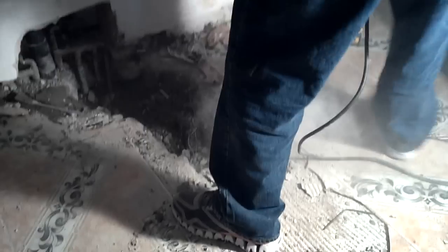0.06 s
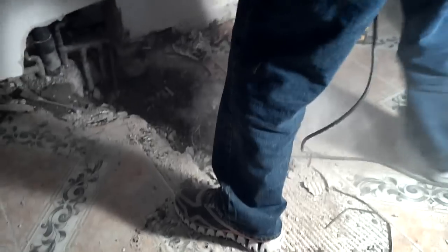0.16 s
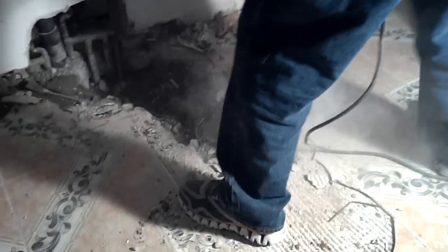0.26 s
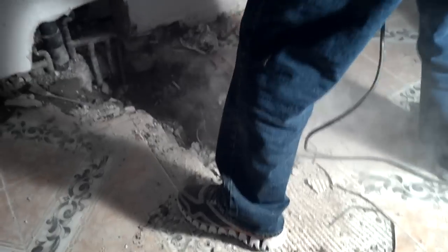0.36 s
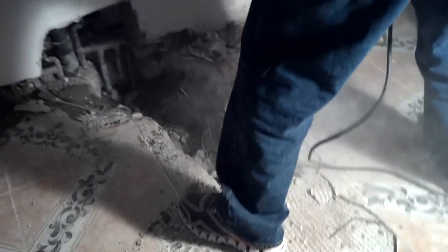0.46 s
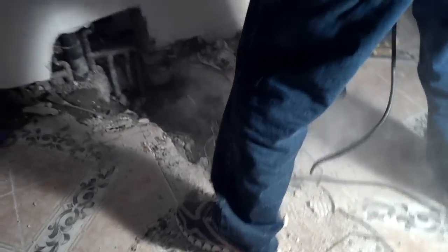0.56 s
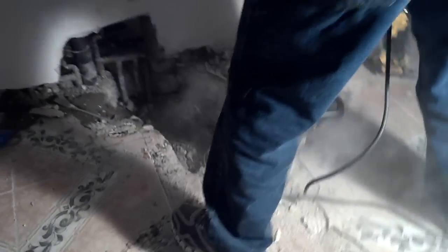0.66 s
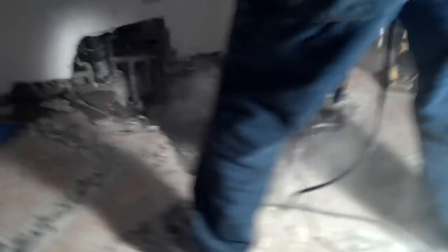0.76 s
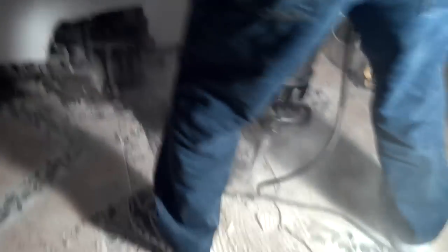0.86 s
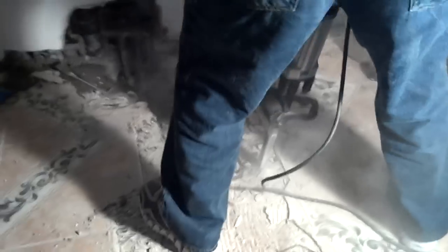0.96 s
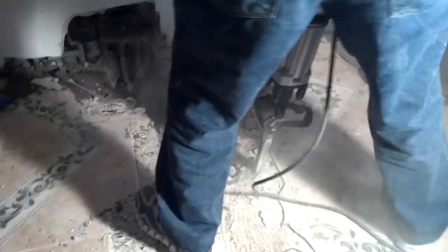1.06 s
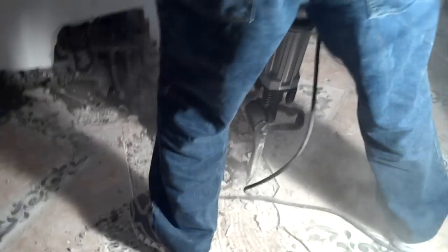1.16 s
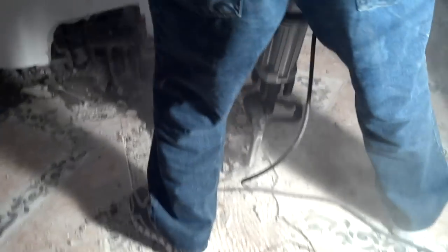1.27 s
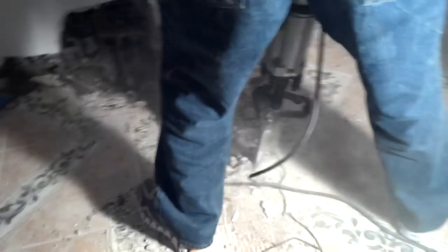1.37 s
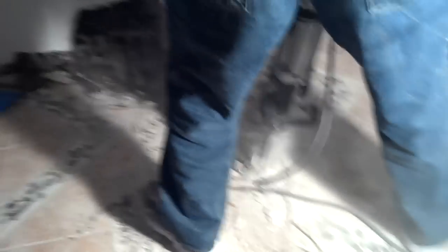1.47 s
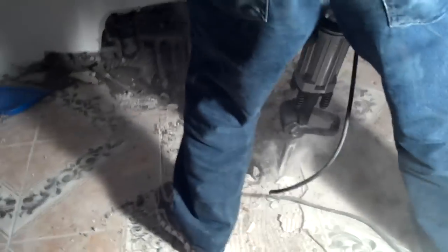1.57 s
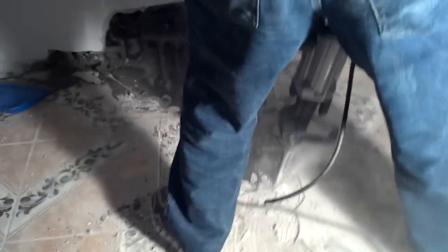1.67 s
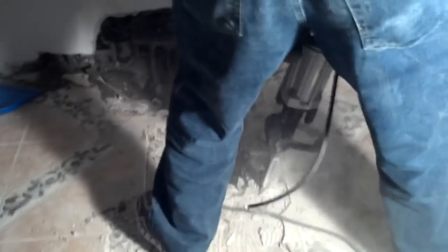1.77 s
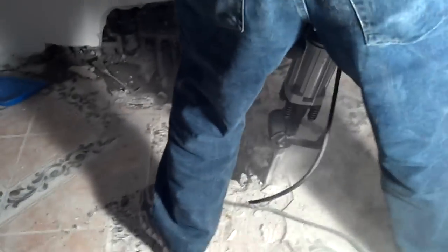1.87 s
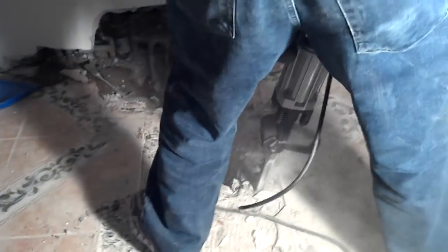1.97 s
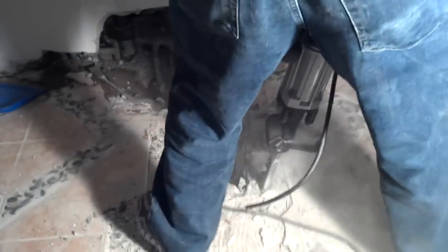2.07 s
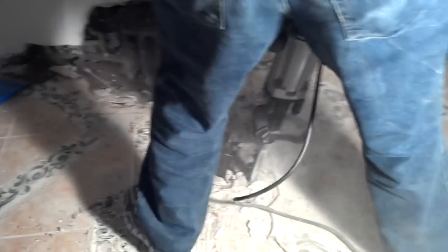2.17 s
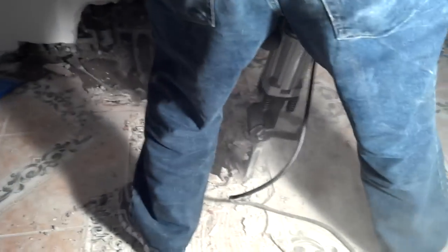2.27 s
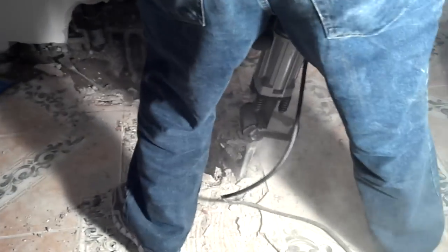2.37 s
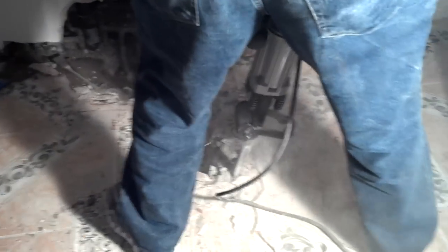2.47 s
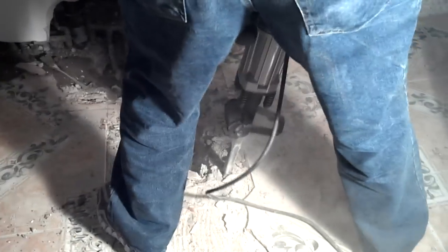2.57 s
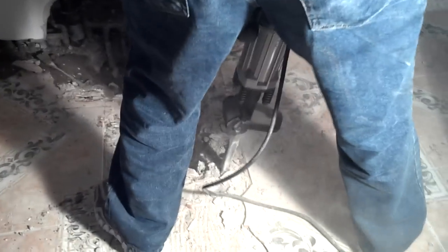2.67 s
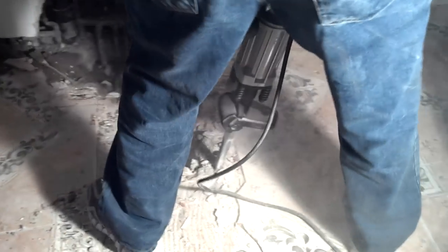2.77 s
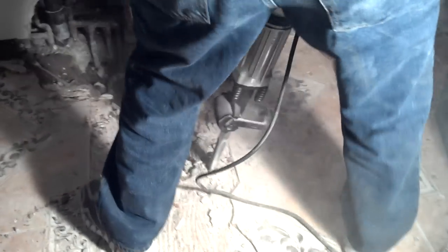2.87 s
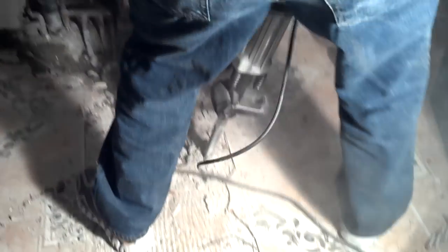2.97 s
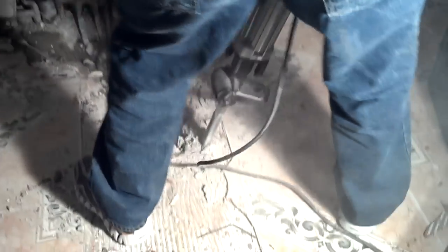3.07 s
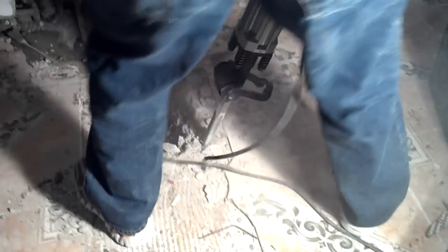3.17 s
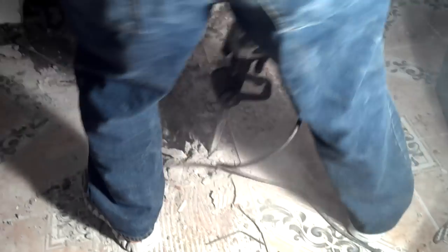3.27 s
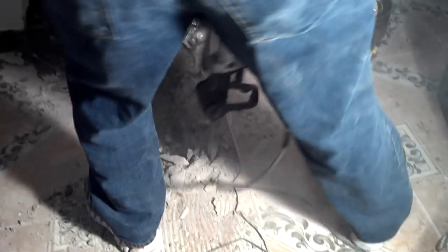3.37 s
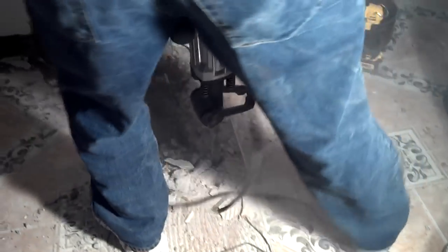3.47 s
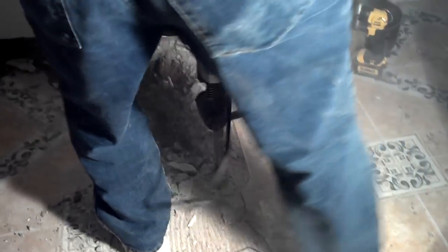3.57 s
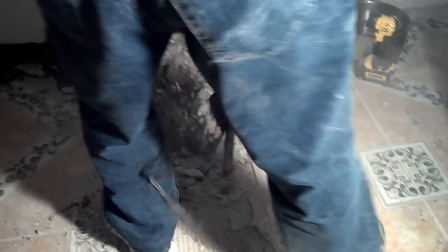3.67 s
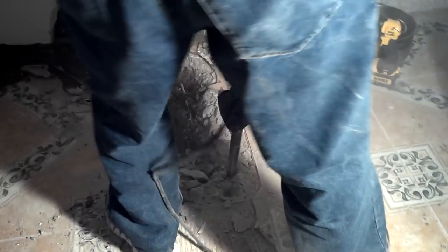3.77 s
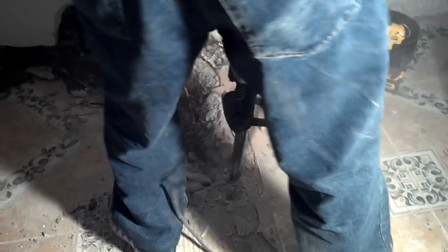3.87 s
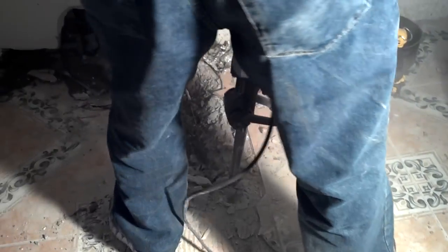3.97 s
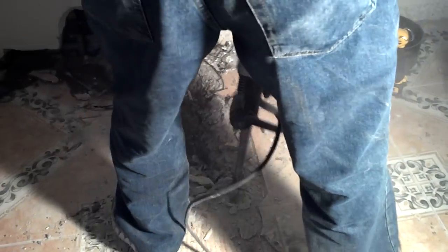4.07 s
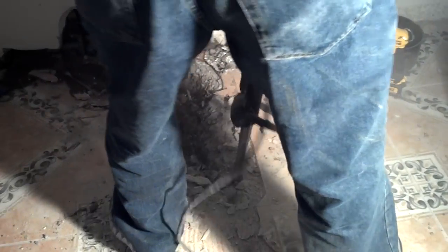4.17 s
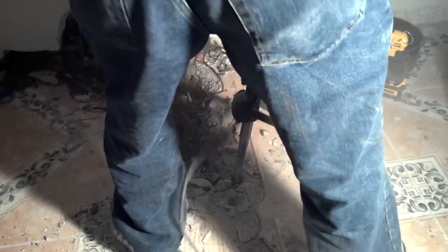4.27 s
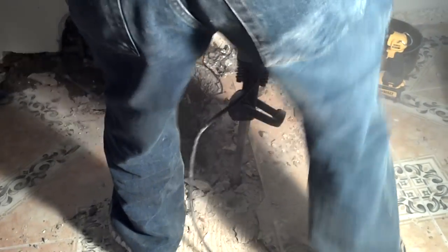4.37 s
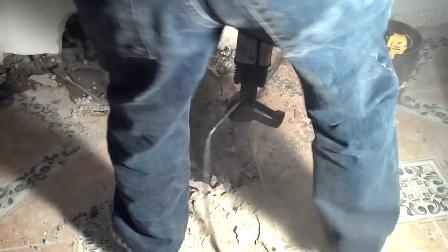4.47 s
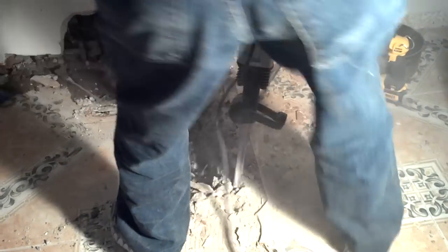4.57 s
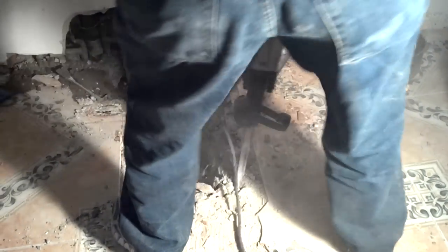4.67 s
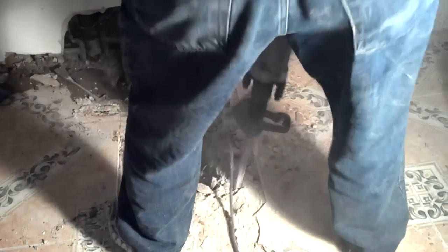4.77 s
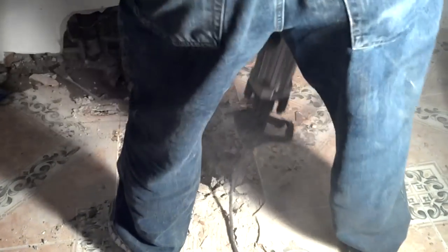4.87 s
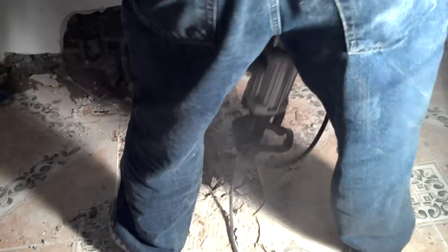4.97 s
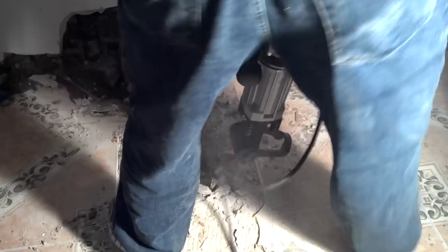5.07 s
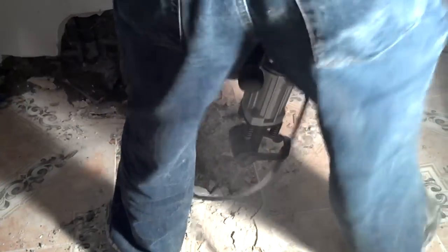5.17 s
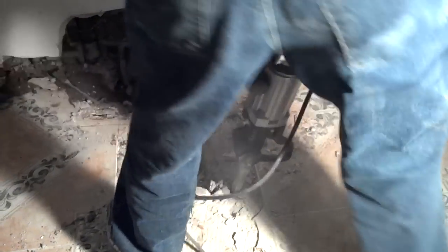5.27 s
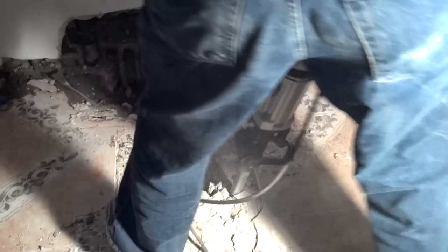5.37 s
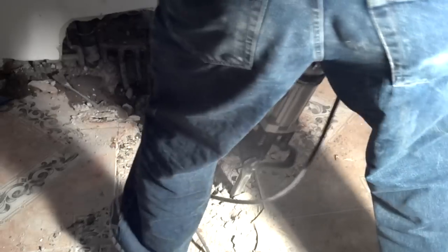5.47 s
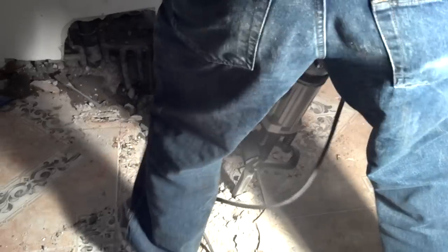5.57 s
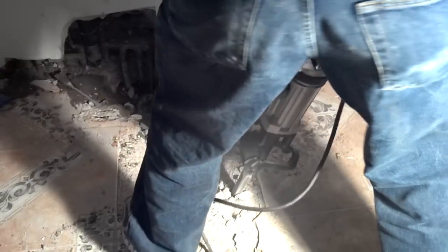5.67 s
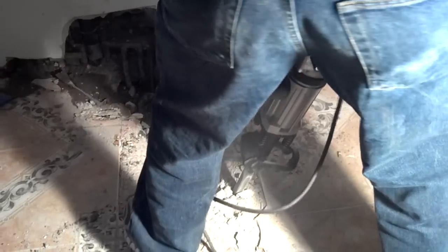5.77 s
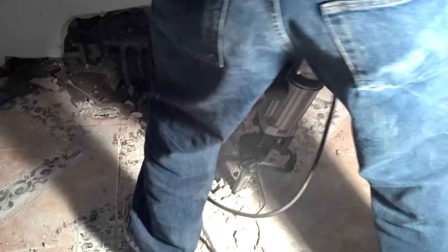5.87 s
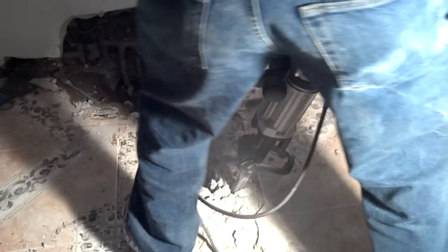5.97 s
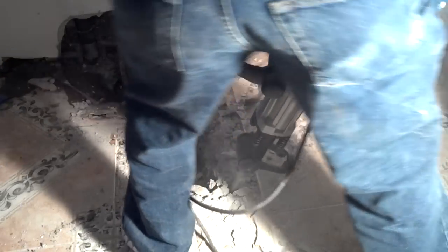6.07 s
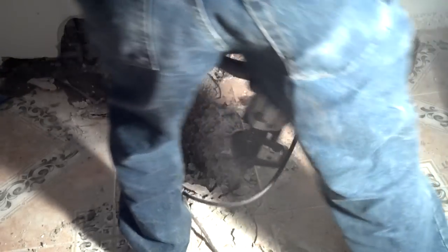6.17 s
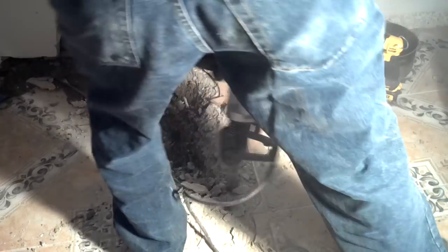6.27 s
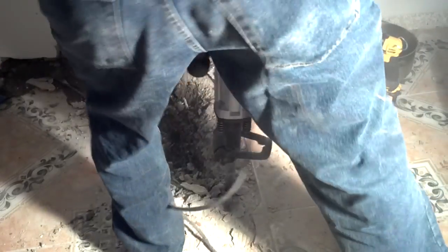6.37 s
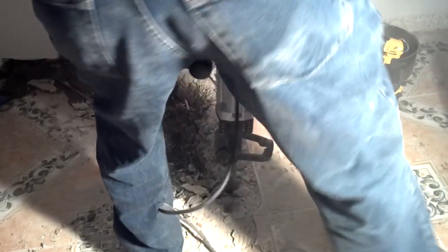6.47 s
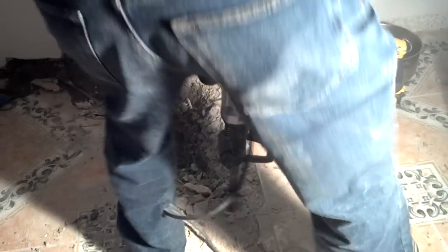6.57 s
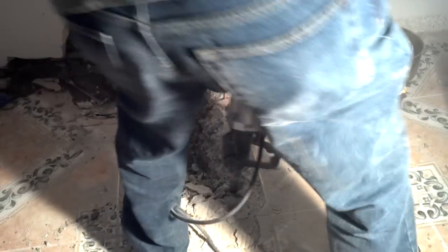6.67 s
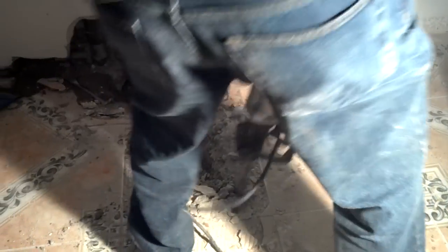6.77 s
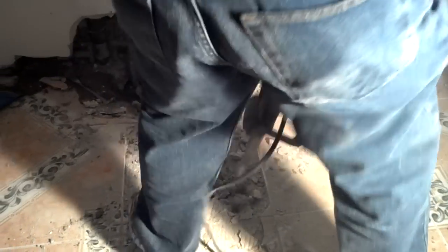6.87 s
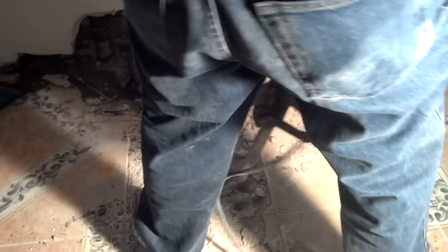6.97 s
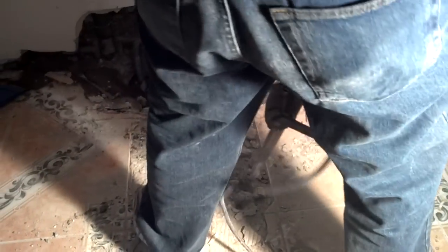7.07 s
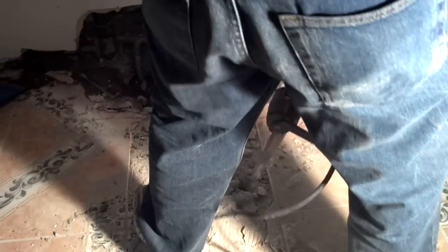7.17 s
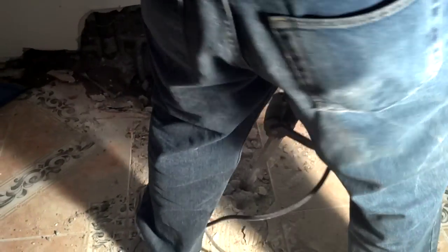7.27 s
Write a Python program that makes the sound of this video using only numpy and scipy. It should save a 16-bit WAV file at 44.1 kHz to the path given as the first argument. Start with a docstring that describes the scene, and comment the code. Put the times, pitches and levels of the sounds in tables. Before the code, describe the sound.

From 0 s a demolition hammer is already working at full force close by, about 21 to 23 blows a second. Each blow is a sharp snap with a rebound click, a mid-low slab thud, gritty tile crack and housing ring; bright steel ringing flares intermittently until about 2.4 s. Loose plates hum along and soft low bumps jolt the phone. Around 3.3 s the tone turns scrapy; at 3.44 s the blows stop, with a graze at 3.5 s, and the motor rises to a rushing whirr with a high gear whine. After light taps at 4.2 s, hammering restarts at 4.34 s, faster at about 30 a second and less thuddy, slowing to about 20 by 5.7 s, with dry splintering cracks strongest near 5.3 s. It stops at 6.17 s; the motor spins up and whirs to the end near 7.4 s, with a few grazing clicks around 6.7 s. Bare room, short reverberation.

```python
"""An electric demolition hammer chisels a tiled concrete floor in a bare room, close to a phone.
Each blow snaps, thuds into the slab, cracks the tile and rings the steel chisel and the housing; the blows
slow down under load. Lifted, the hammer stops striking and its motor, noise with a whine of gears, runs up.
Loose plates ring, pieces split off, the tip scrapes; jolts and bumps reach the phone, which widens the stereo."""
import sys
import numpy as np
from scipy import signal
from scipy.fft import rfft, irfft, next_fast_len
from scipy.io import wavfile
from scipy.ndimage import uniform_filter1d, map_coordinates

SR = 44100
rng = np.random.default_rng(int(sys.argv[2]) if len(sys.argv) > 2 else 0)


def bounce(signal):
    """Save signal as a 16-bit WAV file at the path given by the first command-line argument."""
    frames = np.transpose(np.atleast_2d(signal))
    limited = np.clip(frames, -1, 1)
    pcm = np.round(limited * 32767).astype(np.int16)
    wavfile.write(sys.argv[1], SR, pcm)


N = 322792

# lengths of a blow's tail and of its first moments (samples)
RING_LENGTH, BLOW_LENGTH = SR // 3, SR // 36
# the motor's free speed (crank turns per s)
FREE_SPEED = 29.95
# build-up time of the housing's and the plates' rings (s)
RING_RISE_S = .002
# chance variation of the thud from blow to blow (dB)
THUD_SCATTER_DB = 1.3
# The hammer is pressed to the floor. Each row: first blow in seconds, lifted in seconds.
PRESSED = [(-.023, 3.44), (4.338, 6.17)]
# The chisel sits loose and rings out. Each row: start in seconds, end in seconds, ring level in dB,
# share of the ring in the upper modes 0-1.
LOOSE_CHISEL = [(-.05, .09, -19.5, 0.3), (.31, .40, -17.5, 0.17), (.49, .57, -19.5, 0.3),
                (.58, .72, -19, .15), (.82, .90, -19, 0.2), (.96, 1.03, -20.5, 0.4),
                (1.24, 1.32, -23, 0.24), (1.52, 1.60, -20.5, 0.68), (1.62, 1.70, -19.5, 0.5),
                (1.71, 1.75, -23.5, .15), (1.89, 1.94, -20.5, 0.7), (2.03, 2.08, -17.5, 0.6),
                (2.36, 2.45, -19.3, 0.4), (5.82, 5.86, -25.5, 0)]
# Straight sound that gets past the worker's legs. Each row: time in seconds, level in dB.
PAST_LEGS = [(0, 0), (2.3, 0), (2.8, -1.5), (3.3, -3), (4.4, -5), (5, -6.5), (6.2, -7)]


def amp(db):
    """Decibels to gain."""
    return 10 ** (np.asarray(db) / 20)


def unit(x):
    """x at rms 1."""
    return x / np.sqrt(np.mean(x ** 2) + 1e-20)


def unit_blow(x):
    """x scaled to rms 1 over the first moments of a blow."""
    return x / np.sqrt(np.mean(x[..., :BLOW_LENGTH] ** 2) + 1e-20)


def along(points, hz):
    """(Hz, value) points read on a log frequency axis."""
    f, v = np.transpose(points)
    return np.interp(np.log(hz + 1), np.log(f + 1), v)


def curves(rows, t):
    """Each column after the time, read at times t."""
    s, *cols = np.transpose(rows)
    return [np.interp(t, s, c) for c in cols]


def wobble(rate):
    """A random curve through rate knots a second, smoothly joined."""
    knots = rng.standard_normal(int(N * rate / SR) + 4)
    return map_coordinates(knots, [np.arange(N) * rate / SR])


def filtered(x, response):
    """x times a complex response of frequency."""
    n = x.shape[-1]
    m = 2 * next_fast_len(n // 2 + 2048)
    return irfft(rfft(x, m) * response(np.fft.rfftfreq(m, 1 / SR)), m)[..., :n]


def coloured(x, spectrum):
    """x through the causal, minimum-phase filter that has this spectrum."""
    def response(hz):
        cepstrum = irfft(np.log(amp(along(spectrum, hz))))
        half = len(cepstrum) // 2
        # folding the cepstrum onto positive times makes the filter causal
        return np.exp(rfft(np.r_[cepstrum[0], 2 * cepstrum[1:half], np.zeros(half)]))
    return filtered(x, response)


def resonant(x, modes):
    """x through a body with these resonances, of alternating sign."""
    def response(f):
        total = 0
        for k, (hz, width, db) in enumerate(modes):
            damping = 1j * f * width
            total = total + (-1) ** k * amp(db) * damping / (hz * hz - f * f + damping)
        return total
    return filtered(x, response)


def radiated(x, modes):
    """A ringing body that radiates little deep bass."""
    low_cut = signal.butter(3, 170, "high", fs=SR, output="sos")
    return signal.sosfilt(low_cut, resonant(x, modes))


def diffuse(size):
    """White sound from all sides: alike at both microphones in the bass, a little in the presence range."""
    gap_m = .125  # distance between the microphones
    # Extra likeness from sound straight from the tool. Each row: frequency in Hz, likeness 0-1.
    straight_likeness = [(1300, 0), (2500, .35), (5000, .02)]

    def mid_side(hz):
        alike = np.sinc(2 * hz * gap_m / 343) * .97 + along(straight_likeness, hz)
        return np.sqrt([1 + alike, 1 - alike])

    mid, side = filtered(rng.standard_normal((2, size)), mid_side)
    return unit(np.array([mid + side, mid - side]))


def room(direct_db):
    """The direct sound, reaching the right microphone first, and the bare walls' decaying answer."""
    t60 = .58  # decay time in seconds
    t = np.arange(RING_LENGTH) / SR
    response = diffuse(RING_LENGTH) * amp(-60 * t / t60) * (1 - np.exp(-t / 0.012))
    response /= np.linalg.norm(response[0])
    response[[0, 1], [3, 0]] += amp(direct_db)  # left is 3 samples late
    return response


def in_room(x, direct_db):
    """A steady source heard in the room, at rms 1."""
    return unit(signal.fftconvolve(x[None], room(direct_db), axes=1)[:, :N])


def crushing(spectrum, grain_db):
    """Grainy noise of rms 1: its level flickers at random, then a spectrum colours it."""
    return unit(coloured(diffuse(N) * amp(grain_db * wobble(1500)), spectrum))


def add(track, s, sound):
    """Mix a sound into a track at s seconds."""
    start = round(s * SR)
    sound = sound[..., max(-start, 0):]
    part = track[..., max(start, 0):][..., :sound.shape[-1]]
    part += sound[..., :part.shape[-1]]


def repeated(times, levels_db, sound):
    """The same sound at every time, each at its own level."""
    out = np.zeros((2, N))
    for s, db in zip(times, levels_db):
        add(out, s, amp(db) * sound)
    return out


def slab(times, body, levels_db, direct_db, count=28):
    """Every blow sends the same push through a body and the room; echoes shift as tool and phone move."""
    places = [body(room(direct_db)) for _ in range(count + 1)]
    out = np.zeros((2, N))
    for s, db in zip(times, levels_db):
        k, part = divmod(max(s, 0) * SR / N * count, 1)
        between = (1 - part) * places[int(k)] + part * places[int(k) + 1]
        add(out, s, amp(db) * unit_blow(between))
    return out


def fracture(times, levels_db, burst_db, burst_t60, tail_t60, rise):
    """The swell and decay of every blow: a short burst and a longer tail, added as power."""
    t = np.arange(RING_LENGTH) / SR
    burst, tail = amp(burst_db - 60 * t / burst_t60), amp(-60 * t / tail_t60)
    shape = unit_blow(np.hypot(burst, tail) * (1 - np.exp(-t / rise)))
    power = np.zeros(N)
    for s, db in zip(times, levels_db):
        add(power, s, (amp(db) * shape) ** 2)
    return np.sqrt(power)


def crank(t):
    """Crank speed and load (0 or 1): held down while the chisel is pressed, running up once it is lifted."""
    run_up_s = .32  # time constant
    # Speed under load. Each row: time in seconds, speed in crank turns per second.
    pressed_speed = [(0, 21.822), (.35, 23.116), (.55, 21.362), (1.15, 21.153), (1.55, 21.749),
                     (1.8, 21.429), (2.4, 21.507), (2.9, 21.238), (3.35, 20.203), (4.3, 29.94),
                     (4.5, 29.877), (5.15, 29.557), (5.45, 25.404), (5.7, 20.447), (6.15, 20.637)]
    loaded, = curves(pressed_speed, t)
    speed, load = loaded, np.ones(len(t))
    for start, lifted in PRESSED:
        lack = FREE_SPEED - curves(pressed_speed, lifted)[0]
        run_up = FREE_SPEED - lack * np.exp(-np.maximum(t - lifted, 0) / run_up_s)
        speed = np.where(t < start, speed, np.where(t < lifted, loaded, run_up))
        load = np.where(t < start, load, t < lifted)
    return speed, load


def blow_times(start, lifted):
    """The striker lands once in every crank turn."""
    t = np.arange(start, lifted, 1 / SR)
    turns = np.cumsum(crank(t)[0]) / SR
    return np.interp(np.arange(turns[-1]), turns, t)


def blows():
    """Rows (s, thud dB, crack dB, ring dB) of all blows: each follows the force, a little by chance."""
    crack_scatter_db, ring_scatter_db = 1.3, 1
    # How hard the blows land, before chance. Each row: time in seconds, slab thud in dB, crack in dB,
    # damped chisel ring in dB.
    force_rows = [(0, -22.5, -25, -25.5), (.45, -25.5, -24.5, -25), (.65, -27.5, -22.5, -26.5),
                  (1.05, -25.5, -25, -22), (1.42, -24.5, -25.5, -38), (2.55, -25, -25.5, -42),
                  (2.8, -23, -20, -47), (3.13, -23, -20, -42), (3.28, -28, -22, -27),
                  (3.33, -30, -20, -25.5), (3.38, -42, -19, -32), (3.43, -43, -21, -42),
                  (4.34, -40.5, -26, -46), (4.52, -28, -23, -46), (4.98, -30.5, -24, -32),
                  (5.25, -24.5, -26.5, -35), (5.32, -26, -23.5, -32), (5.54, -27, -20.5, -32),
                  (5.74, -28.5, -27.5, -26.5), (5.95, -31, -22.5, -28.5), (6.13, -30.5, -21.5, -28)]
    # The lifted chisel grazes the floor. Each row: time in seconds, slab thud in dB, crack in dB,
    # chisel ring in dB.
    grazing_blows = [(3.519, -36, -19, -48), (4.213, -52, -27, -42), (4.246, -53, -37, -47),
                     (4.28, -53, -34, -46), (6.653, -49, -32, -45), (6.691, -56, -26, -25.5),
                     (6.723, -42, -26, -40), (6.761, -40, -22, -24)]
    s = np.concatenate([blow_times(*stretch) for stretch in PRESSED])
    thud_db, crack_db, ring_db = curves(force_rows, s)
    chance = rng.standard_normal((len(s), 3)).T
    thud_db = thud_db + THUD_SCATTER_DB * chance[0]
    crack_db = crack_db + crack_scatter_db * chance[1]
    ring_db = ring_db + ring_scatter_db * chance[2]
    for begin, end, db, _ in LOOSE_CHISEL:
        ring_db = np.where((s > begin) & (s < end), db, ring_db)
    return np.vstack([np.column_stack([s, thud_db, crack_db, ring_db]), grazing_blows])


def snap(times, levels_db, centre_hz):
    """The striker's direct pressure pulse: one sharp swing, first at the right microphone."""
    t = np.arange(SR // 200) / SR - .0009
    late_left = np.array([[3 / SR], [0]])
    u = (np.pi * centre_hz * (t - late_left)) ** 2
    return repeated(times, levels_db, (1 - 2 * u) * np.exp(-u))


def striker(times, thud_db, knock_db):
    """A sharp snap at every blow and another as the chisel rebounds and lands, stronger on a hard floor."""
    rebound_s, rebound_spread_s = .0175, .0008
    hard_db = .5 * np.maximum(knock_db, -10)  # the snap takes on half of the floor's knock
    snap_db = thud_db + 14.8 + hard_db + curves(PAST_LEGS, times)[0]
    rebound_db = snap_db + np.minimum(hard_db, 3) - 8.2
    again = times + rebound_s + rebound_spread_s * rng.standard_normal(len(times))
    return snap(times, snap_db, centre_hz=894) + snap(again, rebound_db, centre_hz=1200)


def punch(times, levels_db):
    """The slab swings for a few cycles, first at the right microphone, then again from the nearest wall."""
    wall_delay_s, wall_level_db = .0049, -6.5
    # First swing under the chisel. Each row: frequency in Hz, width in Hz, level in dB.
    swing_modes = [(405, 50, 0), (660, 110, -9)]
    push = np.zeros((2, SR // 10))
    push[[0, 1], [3, 0]] = 1  # left is 3 samples late
    swing = radiated(push, swing_modes)
    swing /= np.abs(swing).max()
    wall_db = wall_level_db + THUD_SCATTER_DB * 2 * rng.standard_normal(len(times))
    direct = repeated(times, levels_db + curves(PAST_LEGS, times)[0], swing)
    return direct + repeated(times + wall_delay_s, levels_db + wall_db, swing)


def housing(times, levels_db, knock_db):
    """Every blow rings the housing anew, its phases at random; a hard floor brings out the upper modes."""
    t60, hardness = .27, .45  # decay in seconds; share of the floor's knock that the upper modes take on
    # The housing's ring between blows. Each row: frequency in Hz, level in dB.
    housing_modes = [(329, 9.5), (365, 8.5), (550, 3.5), (730, -0.5), (971, 0.5), (1010, -1), (1074, 0.5),
                     (1183, 3), (1361, 4.5)]
    t = np.arange(RING_LENGTH) / SR
    hz, mode_db = np.transpose(housing_modes)
    envelope = amp(-60 * t / t60) * (1 - np.exp(-t / RING_RISE_S))
    modes = np.exp(2j * np.pi * hz[:, None] * t) * envelope
    upper = hz > 700
    out = np.zeros((2, N))
    for s, db, hard_db in zip(times, levels_db, knock_db):
        gains = amp(db + mode_db + upper * hardness * (hard_db - 3))
        phases = np.exp(2j * np.pi * rng.random(len(hz)))
        add(out, s, ((gains * phases) @ modes).real)
    return out


def slab_thud(times, thud_db):
    """The floor slab resonates under each blow."""
    # Slab resonances. Each row: frequency in Hz, width in Hz, level in dB.
    slab_modes = [(323.3, 35, 1.5), (369.5, 11.6, 4), (437, 81, -3), (551, 76, 1), (735, 94, -9.5)]
    return slab(times, lambda x: radiated(x, slab_modes), thud_db - 5.5, direct_db=-20)


def body_knock(times, thud_db, knock_db):
    """The hammer's body knocks, harder on a hard floor."""
    # Body resonances. Each row: frequency in Hz, width in Hz, level in dB.
    body_modes = [(690, 160, 4.5), (992, 230, 9), (1164, 290, 4), (1324, 136, 6.5), (1700, 870, -2.5)]
    return slab(times, lambda x: radiated(x, body_modes), thud_db + knock_db - 11.1, direct_db=-16)


def slab_boom(times, thud_db, knock_db):
    """The slab's low boom: a soft, loose floor knocks less and booms more."""
    # Spectrum of the boom. Each row: frequency in Hz, level in dB.
    boom_spectrum = [(70, -43), (125, -11), (208, 4), (285, 0.5), (520, -21.5), (950, -49)]
    loose_db = -.7 * np.clip(knock_db, -7, 5)
    return slab(times, lambda x: coloured(x, boom_spectrum), thud_db + loose_db - 5, direct_db=-22.5)


def tile_crack(times, crack_db):
    """The tile cracks: grainy noise in a fast burst with a tail in the room."""
    # Spectrum of the cracking tile. Each row: frequency in Hz, level in dB.
    crack_spectrum = [(200, -6.5), (700, -4.5), (1400, -2.5), (2200, 10), (3000, 8.5), (4100, 2), (5200, 1),
                      (7000, -10.5), (12000, -15)]
    envelope = fracture(times, crack_db + 2.5, burst_db=-0.5, burst_t60=.05, tail_t60=.32, rise=0.00023)
    return crushing(crack_spectrum, grain_db=1.5) * envelope


def tile_grit(times, crack_db, grit_db):
    """Grit is crushed under the tip: brighter grainy noise, with a shorter burst."""
    # Spectrum of the grit. Each row: frequency in Hz, level in dB.
    grit_spectrum = [(2500, -25), (5000, -0.5), (6400, 7), (7400, 12), (8500, 5), (10500, 1), (13200, 3.5),
                     (14500, -12), (16000, -9.5)]
    level_db = crack_db + grit_db + 0.5
    envelope = fracture(times, level_db, burst_db=5.5, burst_t60=0.022, tail_t60=0.37, rise=0.0005)
    return crushing(grit_spectrum, grain_db=1.5) * envelope


def chisel(times, ring_db, upper):
    """The steel bar, rattling in its holder, rings in fuzzy lines: noise through narrow resonances."""
    # Chisel resonances, lower and upper. Each row: frequency in Hz, width in Hz, level in dB.
    lower_modes = [(4540, 150, -6.5), (6835, 75, -2), (7060, 150, -2), (7265, 130, 1)]
    upper_modes = [(9798, 65, -4), (10020, 45, -3), (12800, 36, 2), (13130, 80, -2)]
    out = np.zeros((2, N))
    for modes, share in [(lower_modes, 1 - upper), (upper_modes, upper)]:
        level_db = ring_db + 10 * np.log10(share) - .8
        swell = fracture(times, level_db, burst_db=-24, burst_t60=0.084, tail_t60=0.31, rise=.0035)
        out += unit(resonant(diffuse(N), modes)) * swell
    return out


def hammer(s, thud_db, crack_db, ring_db):
    """All parts of every blow, balanced by how the tip sits on the floor."""
    # The tip on the floor. Each row: time in seconds, hard knock over the thud in dB,
    # share of the ring in the upper modes 0-1, grit over the crack in dB.
    contact_rows = [(0.0, 10, 0.3, -1), (0.6, 4, 0.15, -2), (1.0, 2.5, 0.33, -0.5), (1.3, 8, 0, -1),
                    (1.6, 4, 0.52, -1), (2.0, 11, 0.6, -0.5), (2.8, 8, 0.13, -3.5), (3.15, 2.5, 0.3, -4),
                    (3.55, 12, 0.9, -11), (4.25, -3, 0.3, -6.5), (4.6, 3, 0.8, -5.5), (5.3, 1, 0, -1),
                    (5.7, -0.5, 0.14, -4), (6.1, -0.5, 0.7, -3), (6.8, -15, 0.16, -7.5)]
    knock_db, upper, grit_db = curves(contact_rows, s)
    for begin, end, _, share in LOOSE_CHISEL:
        upper = np.where((s > begin) & (s < end), share, upper)
    upper = np.clip(upper, .01, .99)
    direct = striker(s, thud_db, knock_db) + punch(s, thud_db + 11.7)
    ringing = housing(s, thud_db - 11.5, knock_db) + chisel(s, ring_db, upper)
    floor = slab_thud(s, thud_db) + body_knock(s, thud_db, knock_db) + slab_boom(s, thud_db, knock_db)
    tile = tile_crack(s, crack_db) + tile_grit(s, crack_db, grit_db)
    return direct + ringing + floor + tile


def plates(times):
    """Loosened plates of tile ring under the blows for a while, each pitch shifting a little by chance."""
    t60, pitch_spread = .22, .004  # decay in seconds; chance change of pitch as a share
    # Ringing plates. Each row: start in seconds, end in seconds, pitch in Hz, level in dB.
    loose_plates = [(-.05, .45, 750, -32), (1.2, 1.55, 1190, -30.5), (1.15, 3.3, 323.4, -31),
                    (2.2, 2.98, 978, -31.5), (4.43, 4.86, 327.4, -32.5), (4.68, 5.1, 634, -39),
                    (5.12, 5.48, 403.4, -29), (5.14, 5.5, 505, -32), (5.68, 5.96, 314, -30.5)]
    t = np.arange(RING_LENGTH) / SR
    decay = amp(-60 * t / t60) * (1 - np.exp(-t / RING_RISE_S))
    out = np.zeros((2, N))
    for begin, end, hz, db in loose_plates:
        for s in times[(times > begin) & (times < end)]:
            pitch = hz * (1 + pitch_spread * rng.standard_normal())
            add(out, s, amp(db) * unit_blow(decay * np.sin(2 * np.pi * pitch * t)))
    return out


def motor():
    """Fan and gears rush with speed and load, throbbing once a crank turn; gear mesh and fan blades whine."""
    mesh_per_turn, blades_per_turn = 145, 34.5  # gear teeth and fan blade passes in one crank turn
    doubling_db, load_db = 12.5, 3.5  # gain for each doubling of speed, and under load
    case_hz, case_width_hz = 3835, 168  # gear case resonance: centre and half width
    # Fan and gear noise at free speed without load. Each row: time in seconds, level in dB.
    motor_level = [(0, -27), (3.2, -21.5), (3.8, -26.5), (4.25, -24), (4.6, -32.5), (5.2, -28.5),
                   (6.4, -24.5), (7.3, -22.5)]
    # Spectrum of the fan. Each row: frequency in Hz, level in dB.
    fan_spectrum = [(80, -42), (320, -4.5), (480, -3.5), (750, -7.5), (1050, -3), (2000, 1), (3900, -5.5),
                    (5000, -9.5), (7300, -11.5), (10000, -17.5), (15500, -34.5)]
    t = np.arange(N) / SR
    speed, load = crank(t)
    speed_db = doubling_db * np.log2(speed / FREE_SPEED)
    db = curves(motor_level, t)[0] + speed_db + load_db * uniform_filter1d(load, size=SR // 5)
    whine_hz = mesh_per_turn * speed
    mesh = 2 * np.pi * np.cumsum(whine_hz * (1 + .001 * wobble(90))) / SR  # phase in radians
    rush = crushing(fan_spectrum, grain_db=0.0) * amp(np.cos(mesh / mesh_per_turn))
    # the whine is loudest as it sweeps through the gear case's resonance
    case_db = -np.minimum(((whine_hz - case_hz) / case_width_hz) ** 2, 16)
    whine = amp(case_db - 10.4) * in_room(np.sin(mesh), direct_db=7)
    blades = amp(-23) * in_room(np.sin(mesh * blades_per_turn / mesh_per_turn), direct_db=2)
    return amp(db) * (rush + whine + blades)


def buffet(times, levels_db):
    """Blows jolt the phone, pushing its two microphones opposite ways; soft low bumps reach both alike."""
    bump_hz, bump_rise_s = 118, .009
    # The phone's resonances. Each row: frequency in Hz, width in Hz, level in dB.
    jolt_modes = [(112, 24, -4.5), (220, 260, -7.5), (477, 100, -6.5)]
    # How firmly the jolts reach the phone. Each row: time in seconds, level in dB.
    jolt_path = [(0, 0), (1.5, 0.5), (2.8, 5), (3.3, 4), (4.5, -5), (5, -5), (5.4, 0.5), (6.1, 2)]
    # Low bumps on the phone. Each row: time in seconds, level in dB.
    bump_rows = [(.16, -20), (0.459, -29), (.645, -28), (0.961, -23), (1.29, -37), (1.531, -26),
                 (1.83, -24), (2.04, -36), (2.31, -28), (2.6, -27), (2.74, -36), (3.025, -20), (3.166, -26),
                 (3.361, -22), (5.14, -29), (5.581, -24)]
    t = np.arange(SR // 6) / SR
    jolt = unit_blow(resonant(signal.unit_impulse(len(t)), jolt_modes))
    chance_db = 3 * rng.standard_normal(len(times))
    jolt_db = levels_db - 8 + curves(jolt_path, times)[0] + chance_db
    bump = t / bump_rise_s * np.exp(1 - t / bump_rise_s) * np.sin(2 * np.pi * bump_hz * t)
    return repeated(times, jolt_db, np.array([jolt, -jolt])) + repeated(*np.transpose(bump_rows), bump)


def splinters():
    """A piece of tile splits off with a short, dry, grainy crack: noise that swells and dies quickly."""
    rise_s = .0018
    # Spectrum of a splitting piece. Each row: frequency in Hz, level in dB.
    splinter_spectrum = [(200, -24), (500, -8), (1300, 9), (2200, -0.5), (3000, -19), (4000, 10.5),
                         (5000, 5), (7000, -8), (13000, -11.5)]
    # Blows that break off a piece. Each row: time in seconds, peak of the swell in dB.
    break_rows = [(.932, -20), (1.217, -22), (1.264, -26), (2.147, -18), (2.565, -35), (3.328, -17),
                  (3.518, -22), (5.046, -19), (5.079, -19), (5.114, -18), (5.146, -18), (5.283, -11.5),
                  (5.318, -14), (5.357, -16), (5.393, -17), (5.474, -17.5), (5.556, -16), (5.84, -23),
                  (5.888, -31), (5.937, -22), (5.986, -17), (6.761, -22)]
    u = np.arange(BLOW_LENGTH) / SR / rise_s
    swells = repeated(*np.transpose(break_rows), u * np.exp(1 - u))
    return crushing(splinter_spectrum, grain_db=3.0) * swells


def scrape():
    """The tip drags over broken tile as the hammer is pulled away: grainy noise that swells and fades."""
    # Level of the scrape. Each row: time in seconds, level in dB.
    scrape_level = [(3.31, -90), (3.335, -20.5), (3.37, -17), (3.41, -24.5), (3.52, -31.5), (3.7, -92)]
    # Spectrum of the scrape. Each row: frequency in Hz, level in dB.
    scrape_spectrum = [(700, -23), (1300, -5), (1750, 1), (2200, -4), (3200, -7), (8000, -25)]
    level_db, = curves(scrape_level, np.arange(N) / SR)
    return amp(level_db) * crushing(scrape_spectrum, grain_db=3.5)


def scene():
    """The working hammer in its room."""
    s, thud_db, crack_db, ring_db = blows().T
    tool = hammer(s, thud_db, crack_db, ring_db) + motor()
    loose_tile = plates(s) + splinters() + scrape()
    return tool + loose_tile + buffet(s, thud_db)


def record(dry):
    """The phone takes from each side a late copy of the other, favours the right, clips and cuts the top."""
    cross, top_hz = .96, 15850  # share of the other side; upper limit in Hz
    late = np.pad(dry[::-1], ((0, 0), (16, 0)))[:, :N]  # sides swapped, 16 samples late
    wide = (dry - cross * late) / np.hypot(1, cross)
    wide = wide * amp([[-.85], [.85]])  # left and right gain in dB
    return filtered(np.clip(wide, -.94, .94), lambda hz: hz < top_hz)


dry = scene()
out = record(dry)
bounce(out)
```